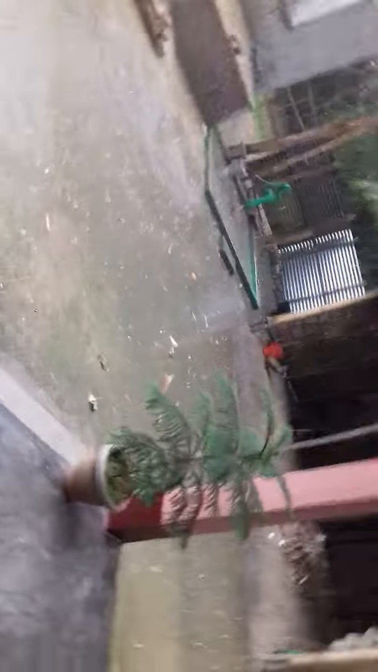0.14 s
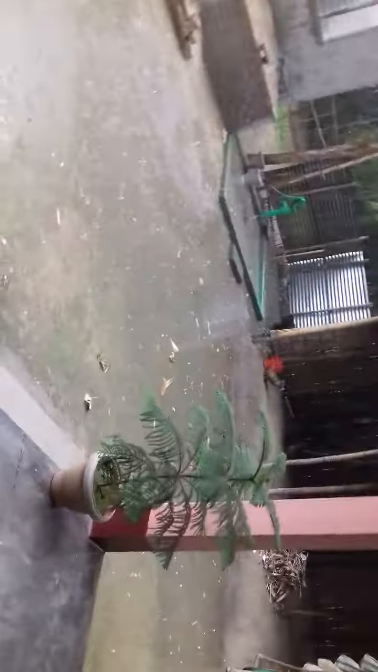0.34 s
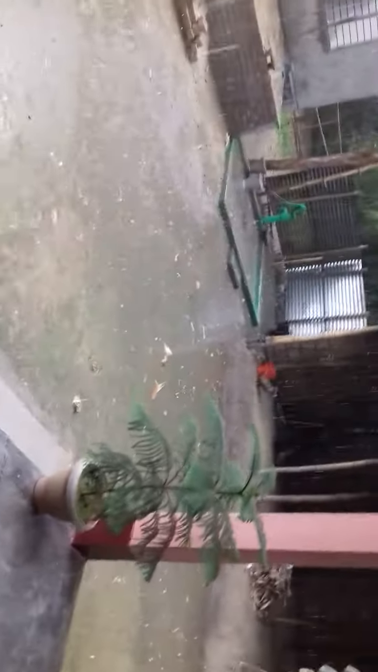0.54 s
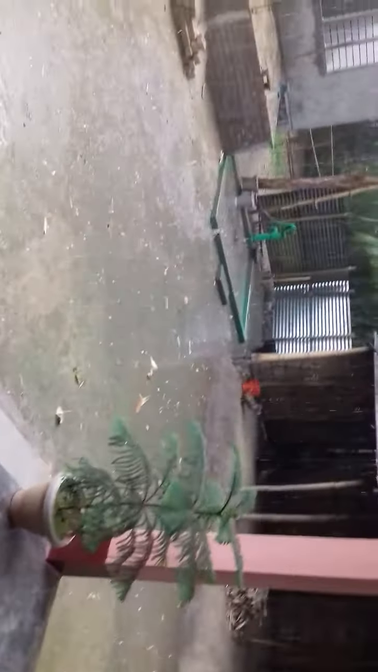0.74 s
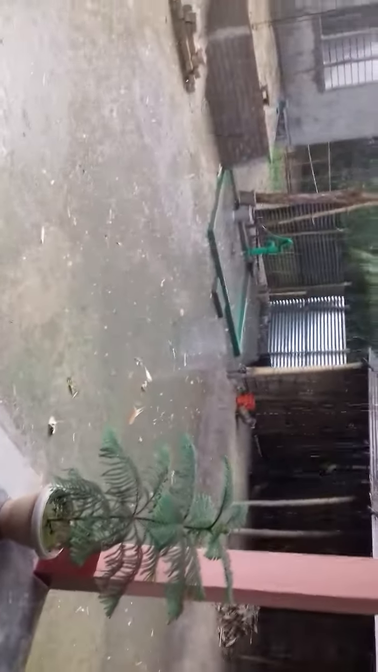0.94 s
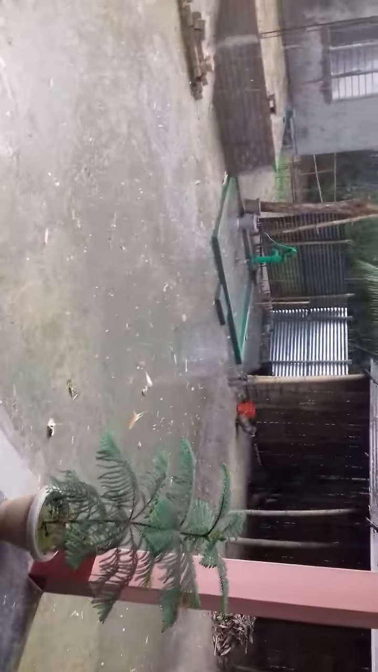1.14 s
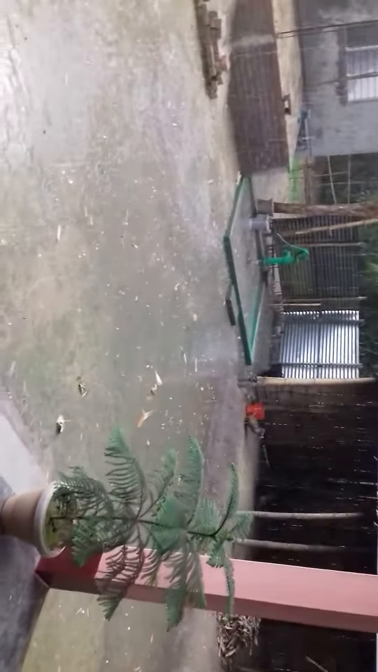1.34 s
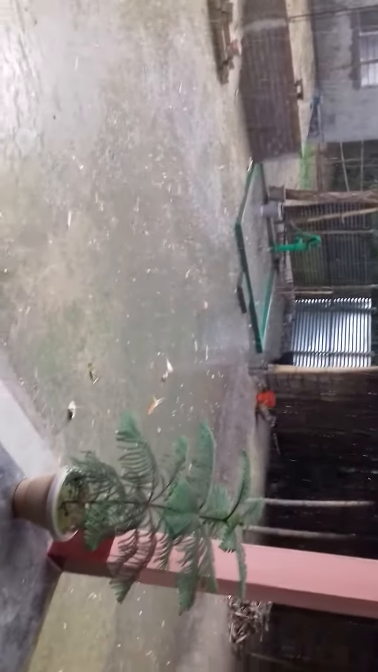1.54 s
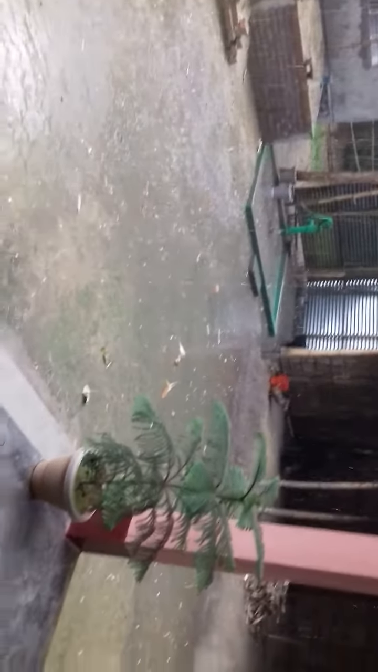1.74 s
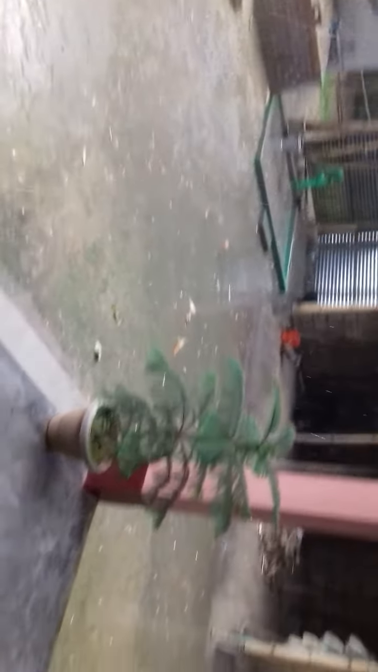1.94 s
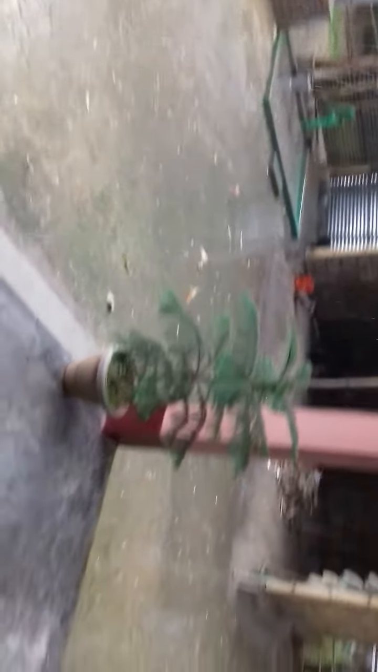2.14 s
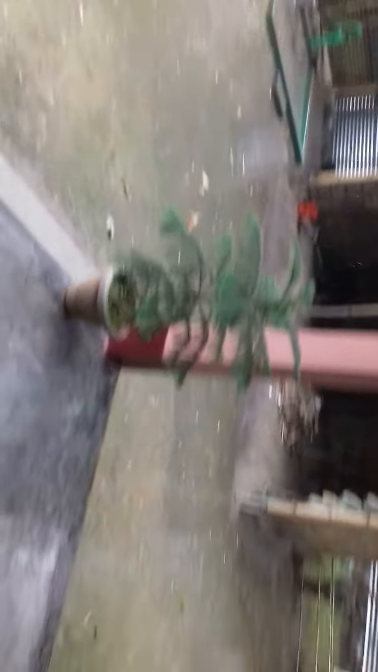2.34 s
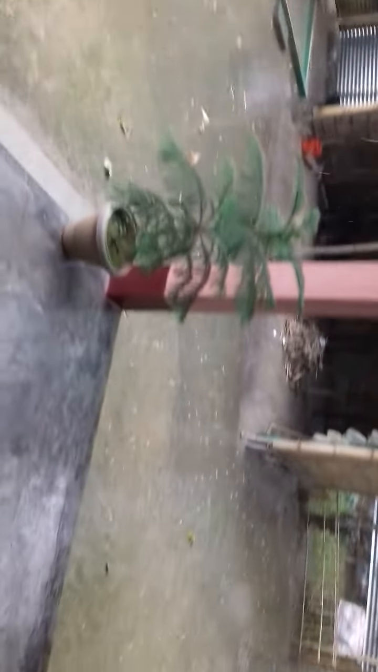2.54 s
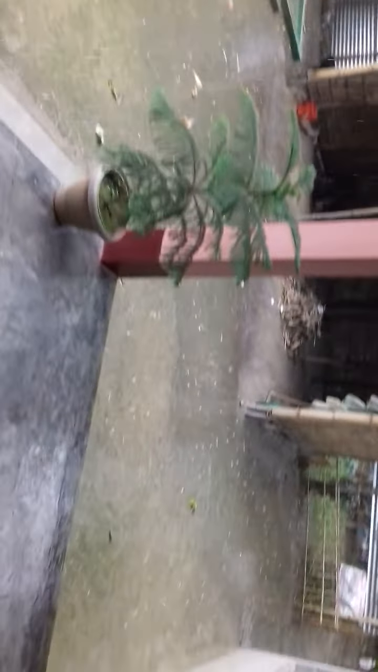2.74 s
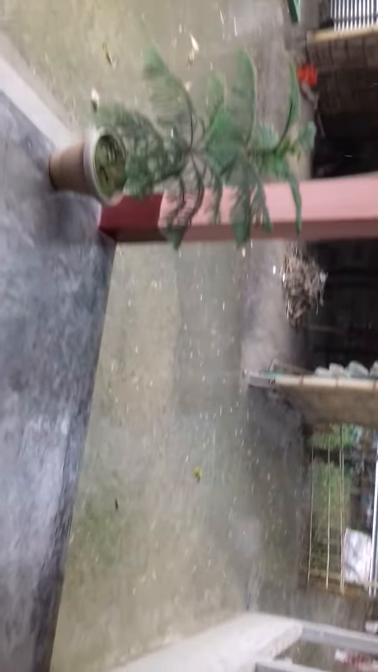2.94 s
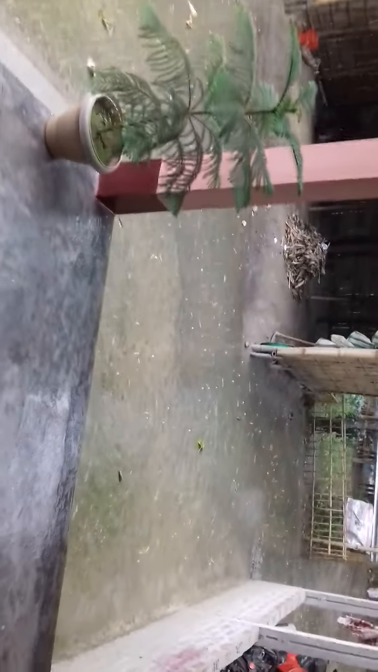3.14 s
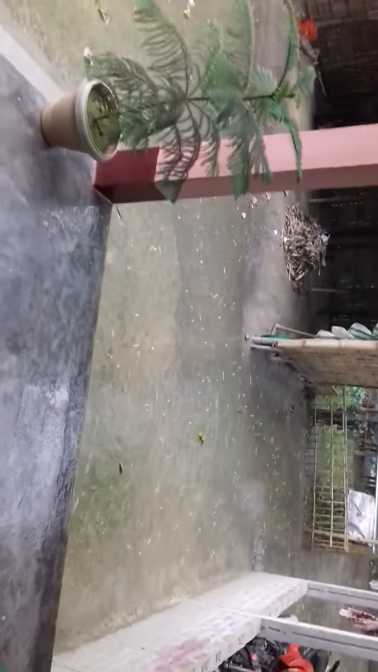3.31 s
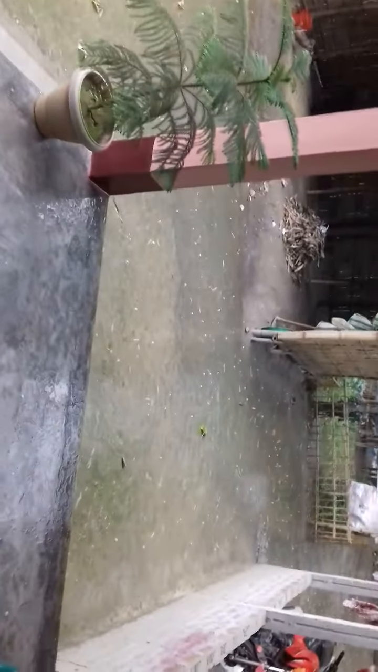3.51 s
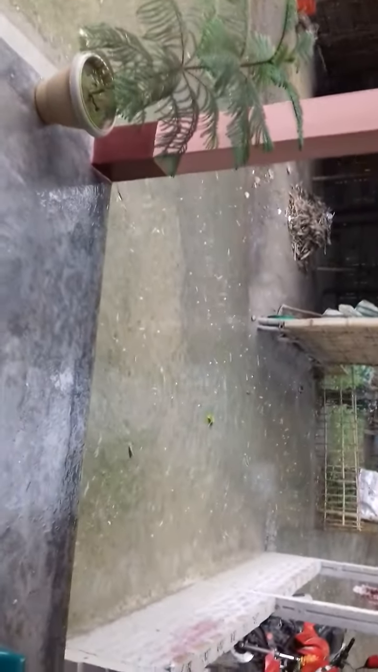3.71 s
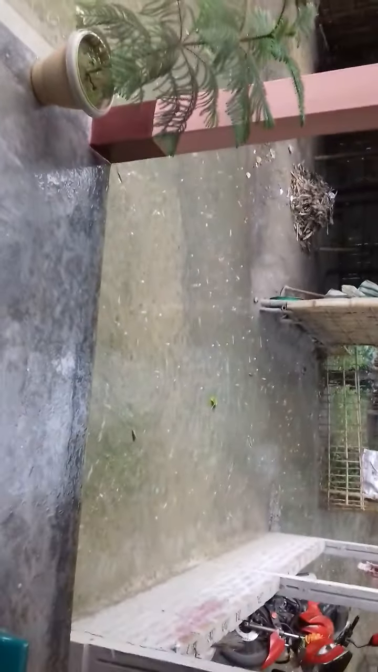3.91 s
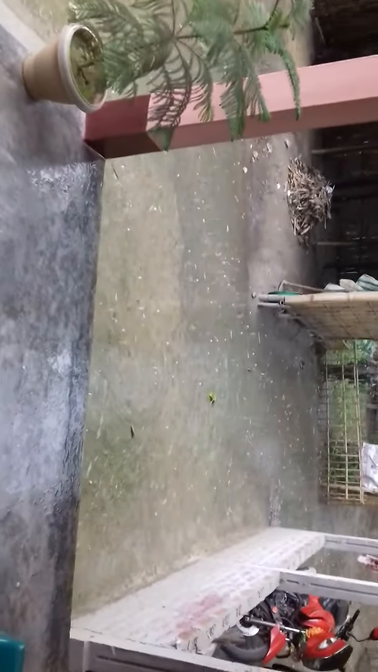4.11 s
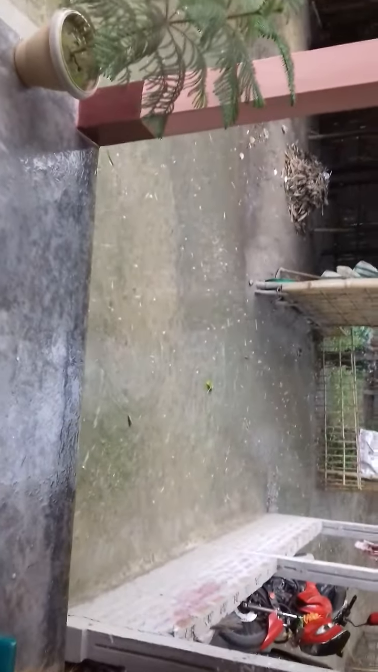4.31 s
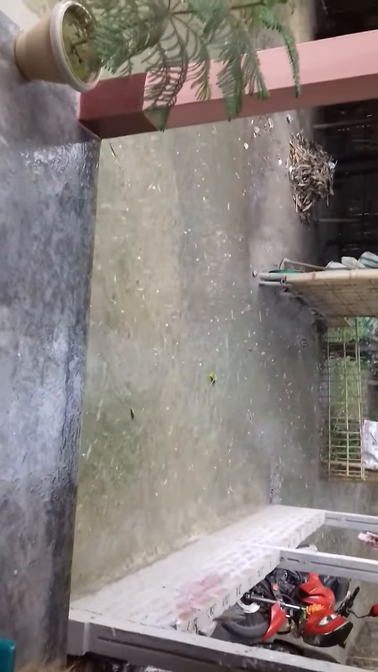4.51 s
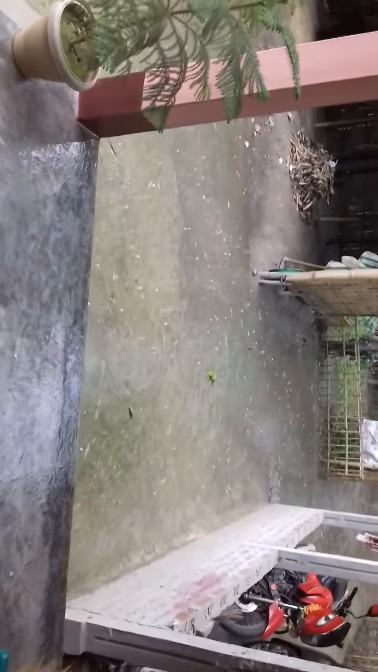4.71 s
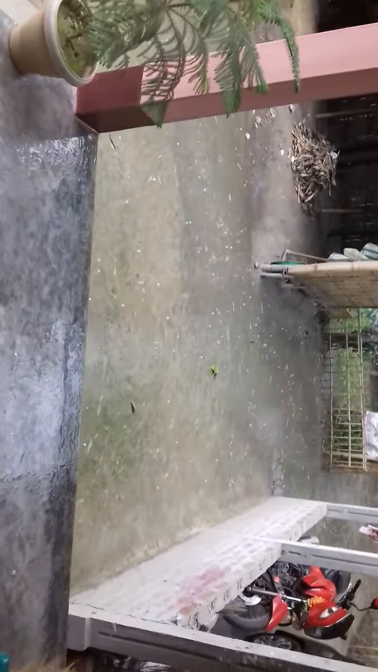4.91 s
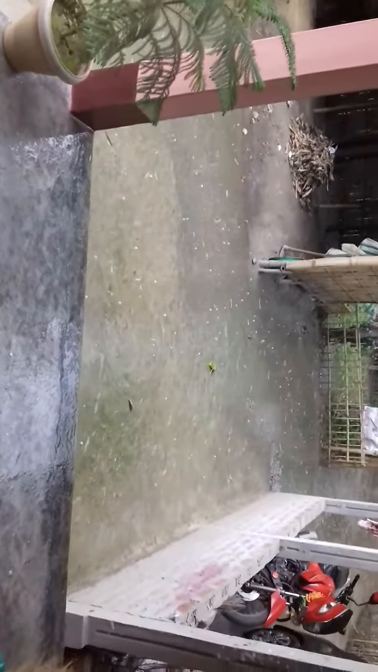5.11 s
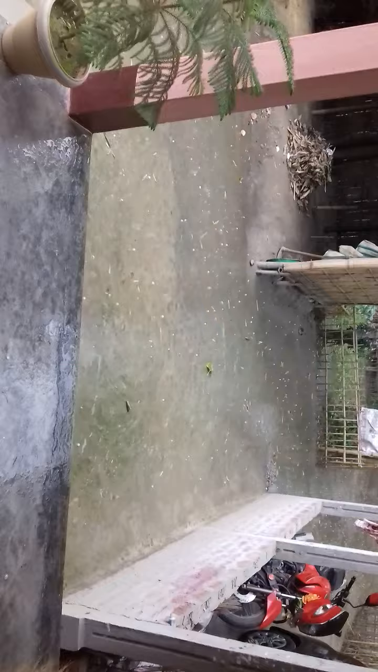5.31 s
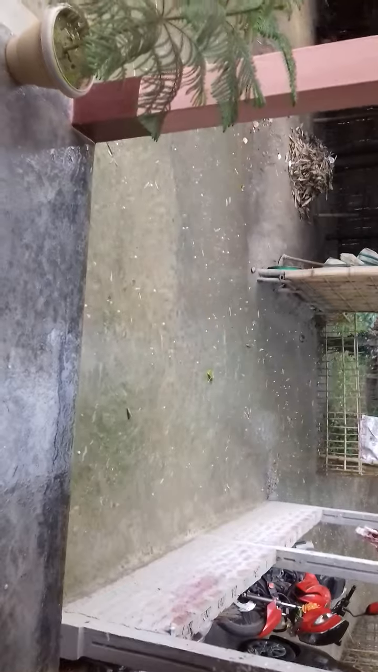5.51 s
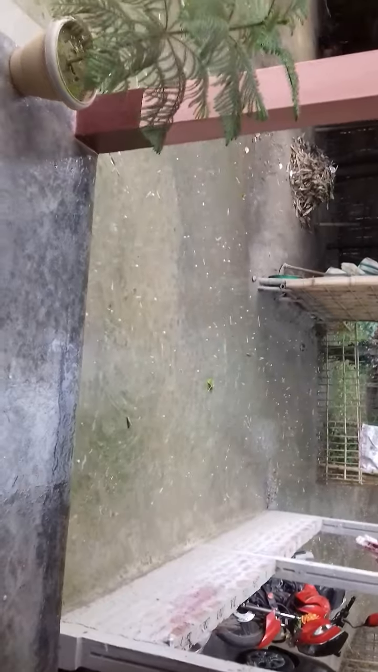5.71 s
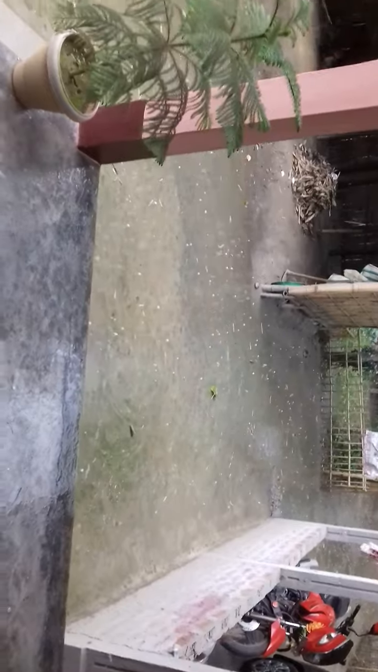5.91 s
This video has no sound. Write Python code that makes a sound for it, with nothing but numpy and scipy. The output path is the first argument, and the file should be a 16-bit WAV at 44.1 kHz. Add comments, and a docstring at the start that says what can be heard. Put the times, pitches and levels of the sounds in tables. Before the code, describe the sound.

After a brief silence, heavy rain and hissing hail fade in at about 0.4 seconds on a concrete yard, heard from under a porch. Countless drops merge into a dense wash, topped by the bright ticking and spraying of small ice pellets. The downpour swells and eases slightly, continuing to the end at around 6 seconds. From 0.6 seconds, big hailstones crack sharply on the concrete and scatter shards, irregularly and several times a second. The strongest cracks come near 1.7, 3.4 and 5.3 seconds, with a tight cluster between 3.6 and 3.9. Other stones strike sheet-metal roofs with short, hollow, ringing knocks and booms, most clearly around 0.6, 1.3, 1.7, 2.8 and 5.6 seconds. Splinters land right by the microphone with brief crackles and low thumps, notably near 1.2, 1.7, 3.4 and 5.3 seconds. The wash dips momentarily at the hardest strikes.

```python
"""A wash of heavy rain and hissing hail fades in on a concrete yard, heard from under a porch.
Countless drops merge into the wash, while small ice pellets tick and spray on the concrete.
Big stones crack, scatter and make the sheet-metal roofs boom; splinters land by the microphone.
Its two openings (ports) ring near 8.5 kHz, and a limiter turns the downpour down at hard strikes."""
import sys
import numpy as np
from scipy import signal
from scipy.fft import rfft, irfft, next_fast_len
from scipy.io import wavfile
from scipy.ndimage import uniform_filter1d

SR = 44100
rng = np.random.default_rng(int(sys.argv[2]) if len(sys.argv) > 2 else 0)


def output_pcm(signal):
    """Save a mono or channel-first signal as 16-bit PCM at the path in sys.argv[1].

    Samples are clipped to [-1, 1] before scaling.
    """
    pcm = np.clip(np.atleast_2d(signal).T, -1, 1) * 32767
    wavfile.write(sys.argv[1], SR, np.round(pcm).astype(np.int16))


N = 262597
TIME = np.arange(N) / SR


def from_db(db):
    """Turn decibels into a number to multiply by."""
    return 10 ** (np.asarray(db) / 20)


def unit_power(x):
    """Scale a sound to an average power of 1."""
    return x / np.sqrt(np.mean(x ** 2) + 1e-20)


def colour(x, tone):
    """Shape lows and highs along a curve of (f/Hz, level/dB) points."""
    size = next_fast_len(N + 8192, real=True)
    hz, db = np.transpose(tone)
    bins = np.maximum(np.fft.rfftfreq(8192, 1 / SR), 1)
    gains = from_db(np.interp(np.log(bins), np.log(hz), db))
    cepstrum = irfft(np.log(gains))
    cepstrum[1:4096] *= 2   # folded so that the filter rings only after a hit, never before
    cepstrum[4097:] = 0
    click_response = irfft(np.exp(rfft(cepstrum)))
    return irfft(rfft(x, size) * rfft(click_response, size), size)[..., :N]


def resonance(x, hz, width_hz):
    """Let a sound ring at one pitch; a narrower width rings longer."""
    r = np.exp(-np.pi * width_hz / SR)
    feedback = [1, -2 * r * np.cos(2 * np.pi * hz / SR), r * r]
    return signal.lfilter(np.array([1, 0, -1]) * (1 - r * r) / 2, feedback, x)


def impacts(per_s, spread_db):
    """Clicks at random moments; a few are much louder (or softer, if the spread is negative)."""
    sizes = from_db(spread_db * np.minimum(rng.exponential(1, N), 4.5))
    return unit_power(sizes * rng.choice([-1, 1], N) * (rng.random(N) < per_s / SR))


def splashes(per_s, spread_db, t60):
    """Random bursts of noise that each start at once and die away."""
    keep = from_db(-120 / (t60 * SR))
    power = signal.lfilter([1], [1, -keep], impacts(per_s, spread_db) ** 2 + 1e-18)
    return unit_power(np.sqrt(power)) * rng.standard_normal(N)


def dying(age, t60):
    """A fade that falls by 60 dB every t60 seconds."""
    return from_db(-60 * age / t60)


def add(track, sound, start_s):
    """Mix a sound into a track at the given time."""
    part = track[int(start_s * SR):int(start_s * SR) + len(sound)]
    part += sound[:len(part)]


# tone of the rain: f/Hz, level/dB
RAIN_TONE = [(30, -28), (70, -19), (130, -9.5), (158, 3), (190, -1), (270, 0), (400, 4), (600, 8.5),
             (1200, 10.5), (2000, 12), (3000, 4.5), (4300, 3.5), (6000, -11), (15000, -16.5)]

def rain():
    """Drops all around merge into a wash; nearer ones splat, and far hailstones knock on roofs."""
    far = rng.standard_normal(N)
    near = splashes(per_s=130, spread_db=1.5, t60=0.059)
    knocks = sum(np.sqrt(hz) * resonance(impacts(per_s=16, spread_db=2.5), hz, width_hz=50)
                 for hz in np.geomspace(240, 1700, num=24))
    wash = far + from_db(-2.5) * near + from_db(-14.5) * unit_power(knocks)
    return colour(unit_power(wash), RAIN_TONE)


# tone of small ice on concrete: f/Hz, level/dB
PELLET_TONE = [(400, -58), (1500, -13), (4200, -1.5), (7000, 2.5), (8600, 3), (10200, -2.5), (11600, -2),
               (13600, -12), (15600, -23)]

def pellets():
    """Small ice hits the concrete in tiny ticks; nearer pellets burst into short sprays."""
    ticks = impacts(per_s=9000, spread_db=-3.0)
    sprays = splashes(per_s=100, spread_db=2.5, t60=0.03)
    return colour(unit_power(ticks + from_db(-4.0) * sprays), PELLET_TONE)


# how hard it pours: t/s, rain level/dB, pellet level/dB
SWELLS = [(0.45, -26, -25.2), (0.7, -22.5, -25), (1.15, -21, -23.5), (1.5, -21, -25), (1.9, -26.5, -28.5),
          (2.3, -22, -23.5), (2.75, -21.5, -24.2), (2.97, -24, -25.7), (3.25, -23, -24.5),
          (3.55, -25.5, -24.7), (3.85, -20, -27.5), (4.1, -26, -27), (4.45, -23.6, -23.5),
          (5.0, -24.5, -25.5), (5.55, -25.5, -27.2), (5.95, -22, -23)]

def downpour():
    """The rain and the pellets swell and ease."""
    t, rain_db, pellet_db = np.transpose(SWELLS)
    wash = from_db(np.interp(TIME, t, rain_db)) * rain()
    hiss = from_db(np.interp(TIME, t, pellet_db)) * pellets()
    return wash + hiss


# tone of breaking ice: f/Hz, level/dB
CRACK_TONE = [(35, -36), (120, -20), (400, -5), (1200, 0.5), (3000, 3.5), (5600, -3.5), (8600, 1),
              (11500, -4), (13500, -9.5), (15600, -14)]
# bright bursts: t/s, level/dB, ring f/Hz
# first row: a step up in hiss as the sound fades in; the rest: big stones that shatter on the concrete
BURSTS = [(0.448, -23, 5500.0), (0.591, -12.5, 5740), (0.68, -18, 6200.0), (0.765, -18, 6500.0),
          (0.823, -13, 12000), (0.986, -24, 6500.0), (1.194, -12, 4200), (1.219, -12, 3200),
          (1.287, -14, 5500.0), (1.418, -18.5, 11800), (1.459, -13, 3380), (1.566, -14, 6500.0),
          (1.689, -8.5, 13400.0), (1.734, -15, 3800.0), (1.862, -21, 6700.0), (1.99, -21.5, 4500.0),
          (2.101, -15, 11200), (2.211, -15, 2300.0), (2.441, -12.5, 12000.0), (2.852, -12, 11600),
          (3.004, -21.0, 3200.0), (3.172, -21, 2600.0), (3.246, -22, 4300.0), (3.383, -10, 14000.0),
          (3.615, -12.5, 11600), (3.673, -10.5, 2600.0), (3.696, -13.5, 11700.0), (3.735, -19, 2480),
          (3.773, -12.5, 5000), (3.823, -11, 11900), (3.882, -13.5, 5330), (3.952, -17.5, 5000.0),
          (4.095, -16, 4200), (4.185, -14.5, 11000), (4.301, -20.5, 10500), (4.424, -16.5, 12500),
          (4.463, -20.0, 4800.0), (4.669, -13, 12500), (5.07, -19, 3300), (5.183, -12.5, 6800),
          (5.233, -15.5, 6300.0), (5.329, -10, 12300.0), (5.366, -15, 2380), (5.618, -15, 11500),
          (5.785, -20.5, 3500.0), (5.86, -17, 2660)]

def ice_cracks(near_db=-10.5, near_scatter_t60=0.25, doubling_db=8.5):
    """After an opening step up in hiss, big stones snap, ring at their own pitch and scatter shards."""
    out, age = np.zeros(N), TIME[:SR]
    shards = impacts(per_s=12000, spread_db=2.0)
    splits = unit_power(np.diff(impacts(per_s=12000, spread_db=4.0)))   # brighter than the shards
    for t, level_db, ring_hz in BURSTS:
        # a faint crack is a far one: its scatter lasts longer and its snap is lost on the way
        fainter_db = near_db - level_db
        scatter_t60 = near_scatter_t60 * 2 ** (fainter_db / doubling_db)
        start = rng.integers(N - 2 * SR)
        scatter = shards[start:start + SR] * dying(age, scatter_t60)
        snap = from_db(2.0 - 0.26 * fainter_db) * splits[start:start + SR] * dying(age, t60=0.027)
        burst = scatter + snap
        add(out, from_db(level_db) * (burst + resonance(burst, ring_hz, width_hz=1000)), t)
    return from_db(-1.63) * colour(out, CRACK_TONE)


# tone of the metal roofs: f/Hz, level/dB
ROOF_TONE = [(60, -42), (160, -6), (400, 7), (650, 10.5), (1200, 12), (2000, 12), (3000, 4), (4200, 2.5),
             (7000, -4), (12000, -19)]
# the ways a roof sheet rings: multiple of its pitch, width/Hz, level/dB
SHEET_RINGS = [(.53, 110, -9.5), (1, 160, 2), (1.85, 260, -3.5)]
# big stones that land on the roofs: t/s, level/dB, sheet f/Hz, knock level/dB relative to the boom
ROOF_HITS = [(.595, -18.5, 2680, 13), (.68, -18.5, 1130, -6), (.845, -16.5, 613, 4), (.9, -21, 1190, 2),
             (.985, -24, 1290, -3), (1.218, -19, 980, 1), (1.296, -16, 1370, 9), (1.355, -24.5, 1420, 8),
             (1.459, -19.5, 990, 6), (1.735, -13, 1540, 4.5), (1.955, -21, 1860, 4), (2.211, -17, 1870, -2),
             (2.458, -19.5, 1300, 9.5), (2.584, -22, 1960, 14), (2.849, -17, 1485, 11.5),
             (3.08, -20, 1220, 3.5), (3.246, -20.5, 1170, 10), (3.428, -22, 1240, -2),
             (3.615, -21.5, 1180, 5), (3.673, -16.5, 1290, 8), (3.773, -20, 1780, 4), (3.881, -18, 1400, 2),
             (4.094, -26.5, 2100, 19), (4.195, -18.5, 1920, -3), (4.463, -24, 2020, 6),
             (4.713, -19, 1185, 15.5), (5.068, -16.5, 1750, -10), (5.21, -19, 1130, 4),
             (5.329, -16.5, 1350, 7), (5.61, -14.5, 1150, 14.5), (5.86, -18, 520, -1)]

def roof_booms(swell_s=0.0081):
    """Bending waves take a moment to spread over the struck sheet, which rings and knocks hollowly."""
    out, age = np.zeros(N), TIME[:SR]
    for t, level_db, sheet_hz, knock_db in ROOF_HITS:
        waves = rng.standard_normal(SR) * (1 - np.exp(-age / swell_s)) * dying(age, t60=0.5)
        rings = sum(from_db(db) * resonance(waves, multiple * sheet_hz, width_hz)
                    for multiple, width_hz, db in SHEET_RINGS)
        knock = resonance(rng.standard_normal(SR) * dying(age, t60=0.17), sheet_hz, width_hz=110)
        add(out, from_db(level_db) * (waves + rings + from_db(knock_db) * knock), t)
    return from_db(-1.0) * colour(out, ROOF_TONE)


# tone of the closest splinters: f/Hz, level/dB
SPLINTER_TONE = [(22, -6), (40, 2), (70, 16), (130, 27.5), (600, 29.5), (2000, 25.5), (5000, 19),
                 (8500, 16), (12000, 20), (15500, 21)]
# splinters that land right by the microphone: t/s, crackle level/dB, thump level/dB
SPLINTER_HITS = [(0.826, -53, -53), (1.194, -40, -37), (1.218, -36, -30), (1.689, -34, -33),
                 (1.735, -40, -38), (2.441, -50, -36), (2.862, -36, -43), (3.384, -32.5, -39),
                 (3.697, -38.5, -39), (3.772, -38, -46), (3.824, -39, -52), (3.881, -42, -42),
                 (4.187, -53, -55), (4.424, -39.5, -45), (5.184, -45, -49), (5.329, -34, -28),
                 (5.366, -40, -43), (5.621, -40, -56)]

def close_splinters(left_db=-1.5, right_db=6.0):
    """Close splinters crackle differently in each port and thump on the ground."""
    crackle_power, thump_power = np.zeros((2, N))
    age = TIME[:SR]
    for t, crackle_db, thump_db in SPLINTER_HITS:
        add(crackle_power, (from_db(crackle_db) * dying(age, t60=0.039)) ** 2, t)
        add(thump_power, (from_db(thump_db) * dying(age, t60=0.091)) ** 2, t)
    grit = np.array([impacts(per_s=4500, spread_db=1.5) * from_db(db) for db in (left_db, right_db)])
    crackle = colour(np.sqrt(crackle_power) * grit, SPLINTER_TONE)
    rumble = resonance(resonance(rng.standard_normal(N), hz=85, width_hz=200), hz=85, width_hz=200)
    return crackle + np.sqrt(thump_power) * unit_power(rumble)


def scene():
    """Left and right hear the same storm; only the closest splinters set them apart."""
    return downpour() + ice_cracks() + roof_booms() + close_splinters()


def microphone_ports(x):
    """The hollows behind the two openings ring, the left one less strongly."""
    left, right = x + from_db(11.5) * resonance(x, hz=8500, width_hz=880)
    left_ring = signal.sosfiltfilt(signal.butter(2, [7250, 8850], "band", fs=SR, output="sos"), left)
    return np.array([left - from_db(-6.5) * left_ring, right])


def limiter(x, threshold_db=-9.5, release_db_per_s=130, ahead_s=0.017):
    """Turn the sound down just ahead of a loud strike, then steadily back up."""
    power = uniform_filter1d(np.mean(x ** 2, axis=0), size=180)
    over_db = np.maximum(10 * np.log10(np.maximum(power, 1e-12)) - threshold_db, 0)
    recovery_db = release_db_per_s * TIME
    cut_db = np.maximum.accumulate(over_db + recovery_db) - recovery_db
    early_cut_db = np.interp(TIME + ahead_s, TIME, cut_db)
    return x * from_db(-uniform_filter1d(early_cut_db, size=200))


# the sound opens from silence: t/s, level/dB
OPENING = [(.342, -120), (.351, -24.5), (.4, -13.5), (.47, -3.5), (.6, -1)]

def record(dry, ceiling=1.3, cutoff_hz=15850):
    """The ports ring, the limiter acts, the sound fades in, peaks are rounded and the top is cut."""
    fade_in = from_db(np.interp(TIME, *np.transpose(OPENING)))
    limited = limiter(microphone_ports(dry)) * fade_in
    rounded = ceiling * np.tanh(limited / ceiling)
    return signal.sosfilt(signal.ellip(10, .2, 90, cutoff_hz, fs=SR, output="sos"), rounded)


dry = scene()
out = record(dry)
output_pcm(out)
```